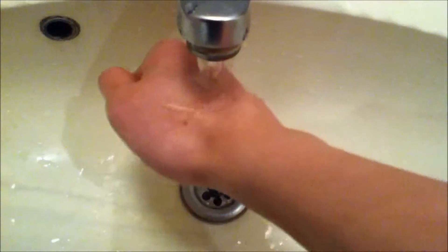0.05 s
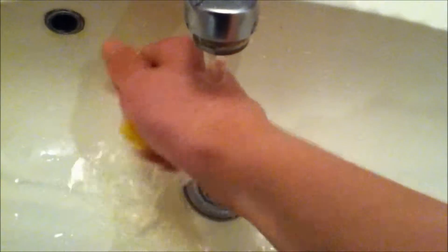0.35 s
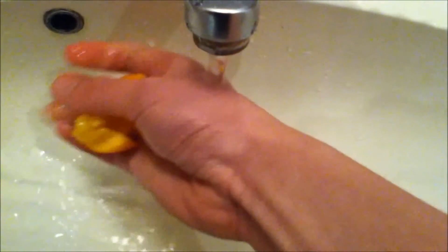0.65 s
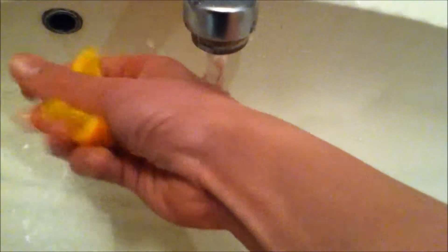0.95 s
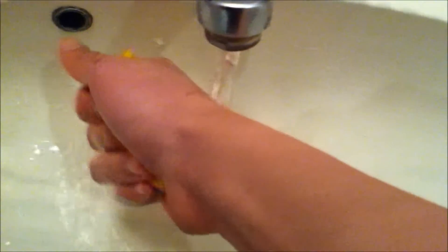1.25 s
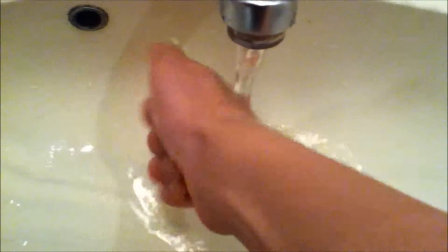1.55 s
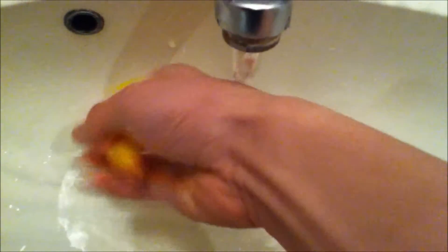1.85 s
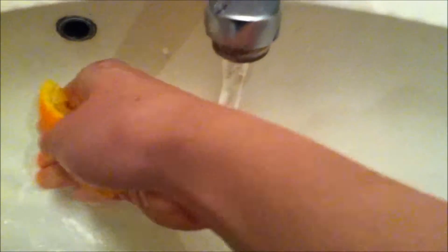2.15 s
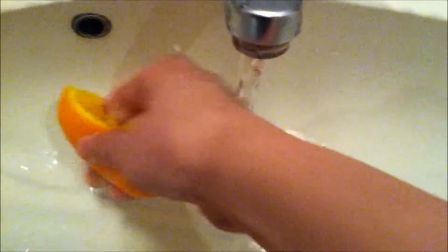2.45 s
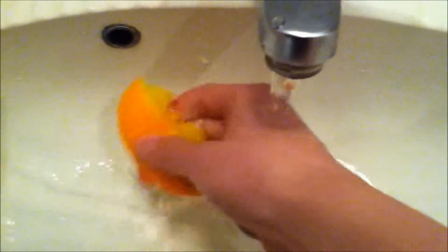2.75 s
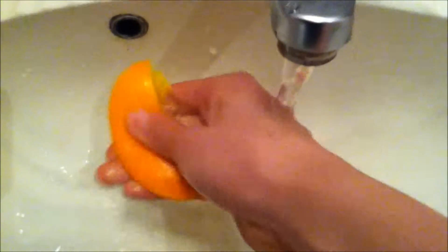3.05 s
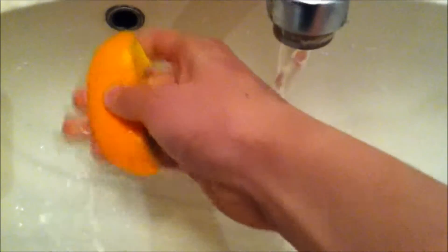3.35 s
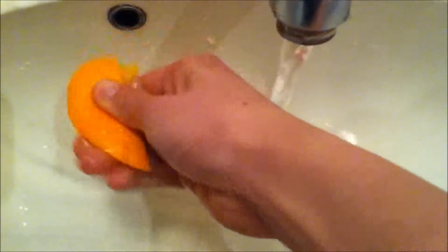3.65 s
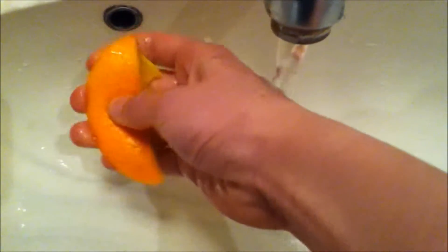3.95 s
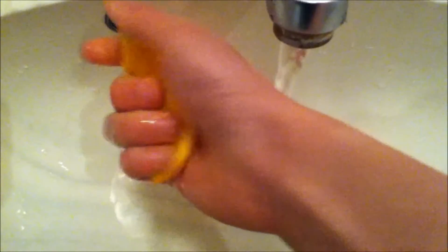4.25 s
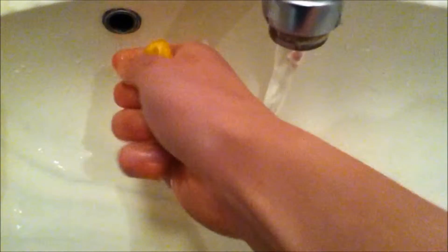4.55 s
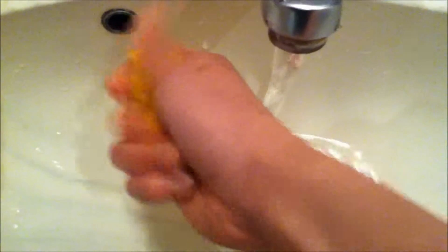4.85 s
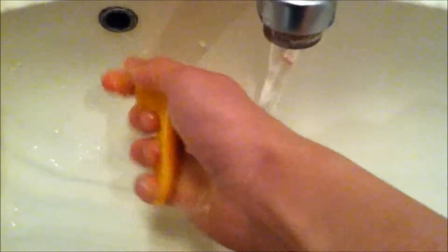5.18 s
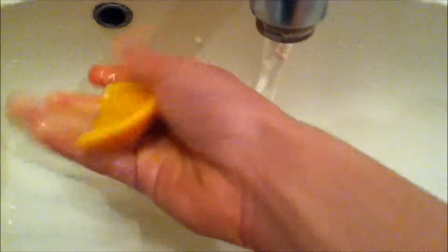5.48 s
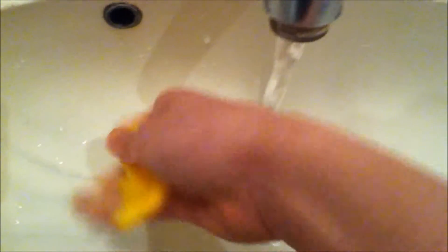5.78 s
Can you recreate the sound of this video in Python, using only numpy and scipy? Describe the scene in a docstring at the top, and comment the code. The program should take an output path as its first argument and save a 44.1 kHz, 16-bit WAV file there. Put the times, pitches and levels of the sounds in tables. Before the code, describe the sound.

Heard from close by, water rushes from a tap and beats on a ceramic sink throughout. It spatters and gurgles off a hand that turns and squeezes a piece of orange, with a sharp wet smack early on and clusters of tiny crackling pops and bubbles after it. Toward the end there are some low, soft thuds and one knock on the basin. The small tiled room adds a brief tail.

```python
"""A tap runs into a ceramic basin in a small bathroom while a hand rinses and squeezes a piece of orange.
The stream drums on the basin, tiny bubbles fizz in the spray, and water gurgles off the hand.
Frothy water sloshes, air pockets pop in the wet palm and big bubbles glug.
There are smacks of water, low thuds and, near the end, a knock against the basin.
The basin throws the splashes straight back and the tiled room adds a short tail."""
import sys
import numpy as np
from scipy import signal
from scipy.fft import rfft, irfft
from scipy.io import wavfile

SR = 44100
rng = np.random.default_rng(int(sys.argv[2]) if len(sys.argv) > 2 else 0)


def pcm_store(signal):
    """Save signal as 16-bit PCM."""
    levels = np.round(np.clip(np.atleast_2d(signal), -1, 1) * 32767)
    wavfile.write(sys.argv[1], SR, levels.astype(np.int16).T)


N = 265482
T = np.arange(N) / SR

# Levels in these tables are relative: the mix turns each layer up or down afterwards.
# The tone of the aerator, the mesh that mixes air into the stream. Each row: pitch in Hz, level in dB.
AERATOR_TONE = [(20, 0), (60, 7), (110, -1), (300, 12), (600, -2), (1050, -24), (1350, -29), (2800, 1.5),
                (3450, 11.5), (4100, 3), (5600, -11), (9000, -9), (12000, -10), (16000, -7)]
# The spout rings with the flow. Each row: pitch in Hz, starting width in Hz (tap widens it), level in dB.
SPOUT_RINGS = [(1286, 85, 1.5), (1560, 40, -14), (1950, 130, 1), (2360, 850, -7.5), (3152, 120, 3.5),
               (3480, 200, 5.5), (5300, 310, -13)]
# Low notes of the basin and the space around it. Each row: pitch in Hz, width in Hz, level in dB.
BASIN_RINGS = [(104, 24, -11.5), (148.65, 6.5, -2.5), (165, 3.8, -12.5), (184.3, 10.7, -2.5),
               (196.6, 11.5, -2.5), (208.7, 8.3, -0.5), (229.8, 6.2, -7), (252.3, 16, -8), (284.6, 7.6, -5),
               (315.6, 6.3, -5), (334.6, 17.5, -11), (349, 7.6, -12), (394.5, 8.6, -9), (435.5, 13.5, -11),
               (480.5, 15.3, -11.5), (512, 19, -16), (558.6, 5.2, -9), (695, 9.8, -12.5)]
# Water running off the hand into the bowl. Each row: time in seconds, level in dB.
RUNOFF_LEVELS = [(0.0, -46.5), (0.91, -57), (1.63, -48.5), (1.84, -53), (2.04, -57.5), (2.46, -46.5),
                 (2.93, -55), (3.66, -52.5), (3.9, -46.5), (4.03, -46.5), (4.24, -53), (4.46, -50),
                 (4.74, -44.5), (5.35, -52.5), (5.55, -51.5), (5.7, -48.5), (6.02, -50.5)]
# Spray off hand and peel, weaker where the water runs smoothly. Each row: time in seconds, level in dB.
SPRAY_LEVELS = [(0, -44), (.8, -45), (1.12, -42), (1.36, -37), (1.55, -40), (1.86, -42), (1.96, -49.5),
                (2.07, -41.5), (2.18, -42), (2.33, -40.5), (2.5, -42), (2.59, -46.5), (2.7, -45),
                (2.92, -43), (3.03, -53), (3.3, -41.5), (3.38, -52), (3.45, -42), (3.85, -39),
                (4.18, -40.5), (4.26, -49), (4.45, -41.5), (4.9, -43.5), (5.04, -44), (5.2, -42),
                (5.55, -48), (5.74, -42.5), (5.8, -44.5), (5.87, -46), (6.02, -45.5)]
# Extra spray from a squeeze or a turn of the hand. Each row: time of the peak in seconds, level in dB.
SPRAY_SPLASHES = [(.125, -52), (0.496, -28.5), (.68, -48), (.94, -38), (1.4, -49), (1.69, -39.5),
                  (2.15, -32), (2.28, -38.5), (2.749, -41), (3.15, -49.5), (3.3, -36.5), (3.41, -34.5),
                  (3.67, -38), (4.44, -33), (4.55, -33.5), (4.685, -36), (4.73, -32.5), (4.85, -45),
                  (5.635, -35.5), (5.91, -67)]
# The tone of the spray. Each row: pitch in Hz, level in dB.
SPRAY_TONE = [(600, -15), (1500, -4.5), (2700, -5.5), (3500, -2), (4300, -5), (5000, -1), (5700, 1),
              (6800, 1), (8000, 1.5), (9500, 0.5), (12000, -3.5), (16000, -20)]
# The finest spray compared with the rest. Each row: time in seconds, level in dB.
MIST_LEVELS = [(0, 0), (.8, -2.5), (1.1, 3), (1.42, -1), (1.6, -7), (1.7, -1.5), (1.95, -0.5), (2.2, -3),
               (2.35, -7.5), (2.75, -4.5), (3.05, 2.5), (3.7, -2), (4.1, -7), (4.42, -1), (5.3, -5.5),
               (6.02, 1)]
# Sheets of frothy water squeezed out or spilling off the hand.
# Each row: start in seconds, length in seconds, level in dB, first pitch in Hz, last pitch in Hz.
HAND_SLOSHES = [(0.026, 0.068, -46.5, 3430, 4530), (0.08, 0.056, -41, 2750, 1700),
                (0.486, 0.016, -26.5, 3170, 2750), (0.492, 0.021, -43.5, 1500, 2100),
                (0.523, 0.081, -44.5, 4530, 3670), (1.143, 0.026, -41.5, 2140, 2310),
                (1.261, 0.3, -46.5, 3130, 3760), (1.4, 0.021, -45, 2000, 2150),
                (1.549, 0.088, -57, 1300, 1660), (1.683, 0.16, -55.5, 1610, 1493),
                (2.227, 0.13, -45, 2410, 4300), (2.519, 0.087, -41.5, 1220, 2100),
                (2.746, 0.036, -41.5, 4200, 4600), (3.129, 0.044, -44, 2100, 2600),
                (3.424, 0.09, -47, 3900, 2900), (3.696, 0.087, -38.5, 300, 338),
                (4.431, 0.088, -47, 3570, 3470), (4.705, 0.1, -41.5, 1690, 2600),
                (4.833, 0.026, -40, 3530, 3460), (5.03, 0.038, -43, 1830, 1950),
                (5.235, 0.05, -41.5, 2550, 3250), (5.348, 0.055, -42.5, 2610, 1750),
                (5.471, 0.037, -48, 3900, 4000), (5.648, 0.039, -43, 1500, 2140)]
# The loudest air pockets bursting in palm and peel. Each row: time of the peak in seconds, level in dB,
# pitch in Hz, length in milliseconds, share of toneless crack from 0 to 1.
BIG_POPS = [(.049, -25.5, 3670, 1.4, .1), (.0926, -30.5, 4390, 2.2, 0), (.1208, -4, 5950, 0.74, 0.5),
            (.1355, -17.5, 4750, 1.6, 0.64), (.1502, -25, 8740, 1.1, .1), (.1756, -16, 5550, 1.14, .7),
            (.192, -25, 8500, .9, 0.1), (.2337, -20, 7440, .7, 0.2), (.2699, -16.5, 6020, .8, 0.5),
            (.293, -23.5, 5500, 2.2, 1), (.3364, -14.5, 7460, 1.24, 0.93), (.4202, -17, 5150, 1, 0.73),
            (.4499, -29, 3830, 1.3, 0.2), (.469, -19, 6270, .9, 0.75), (.4917, -9.5, 4570, 2.7, 0.13),
            (.4956, -9, 4800, .9, 0), (.4978, -3, 4950, .55, 0.7), (.4997, -14, 4600, .79, 0.3),
            (.5068, -20, 5470, 1, .5), (.58, -16, 7400, .73, .7), (.586, -20.5, 4370, .82, 1),
            (.6278, -25.5, 8000, .8, 0), (.6305, -24.5, 4250, 2.8, 0.2), (.6736, -18, 7000, 1.1, 0.5),
            (.6888, -24, 5750, 1.3, 0.2), (.7052, -20, 7400, .7, .5), (.7075, -30, 5300, 2.8, 0),
            (.7455, -24.5, 6960, .9, 0.4), (.7807, -22.5, 4700, 1.3, 0), (.811, -28.5, 5900, 1.8, 0),
            (.8248, -23, 4070, 3.2, 0.26), (.8576, -30, 7100, 2, 0), (.8653, -21.5, 4690, 1.9, 0.5),
            (.9265, -9, 6160, 1, .4), (.9928, -31, 4970, 3.2, 0), (1.0012, -15, 7200, .7, 0.3),
            (1.091, -33, 4040, 2.7, 0.2), (1.1571, -24, 6420, .7, 0.3), (1.1746, -14, 7200, .85, 0),
            (1.2139, -12, 10000, .28, 0.3), (1.2189, -27.5, 4920, 1.3, 0.19),
            (1.2543, -18.5, 7100, .88, 0.7), (1.2964, -18, 4080, 1.7, .15), (1.3068, -10.5, 9000, .55, 0),
            (1.3138, -17, 7410, .62, .5), (1.3271, -33, 4180, 1.6, 0), (1.3431, -26.5, 9950, 1.5, 0.2),
            (1.3488, -19, 6200, 1.4, .9), (1.354, -21.5, 4220, 1.3, 0.1), (1.3674, -29, 4440, 2.6, 0.1),
            (1.3708, -17, 7300, .8, 0.82), (1.3983, -9.5, 6900, 1.6, 0.95), (1.4017, -8.5, 7760, .9, .6),
            (1.4138, -17.5, 5740, 1.2, 0.2), (1.4202, -21, 9400, .8, 0.6), (1.4292, -17, 7600, .9, .6),
            (1.4458, -14, 8000, .74, 0), (1.4498, -26, 3820, 1.6, 0), (1.468, -31, 3870, 2.6, 0.1),
            (1.4754, -17, 6900, .8, 0.8), (1.5274, -31.5, 5650, 1.4, 0.2), (1.6154, -25.5, 3840, 1.6, 0.2),
            (1.7205, -30, 8270, 1.1, .1), (1.7449, -14, 3810, 3.4, 0.5), (1.7455, -22, 6170, 2.4, 0),
            (1.7825, -28, 8800, 1.3, 0.6), (1.7936, -21, 5900, 1.7, 0.5), (1.815, -27, 5900, 3.4, .25),
            (1.8255, -12, 5500, 1.5, .35), (1.845, -27, 6600, 1.6, 0), (1.8604, -10, 7300, .8, 0.83),
            (1.8934, -18.5, 5050, 1.6, 0.3), (1.9068, -22.5, 6100, 1.2, 0.6),
            (2.0186, -14.5, 6000, 1.7, 0.04), (2.0556, -16.5, 8000, 1.4, .83),
            (2.1452, -24, 6800, 2.6, 0.3), (2.1485, -19.5, 10000, .68, 0.65), (2.1558, -15, 8140, .75, 0.9),
            (2.1929, -29, 7490, 2, 0.2), (2.2039, -19, 7500, 1.3, 0.4), (2.208, -27.5, 3700, 3, .05),
            (2.2126, -11, 5240, .66, .65), (2.2444, -27, 5870, 1.1, .4), (2.2574, -15.5, 8300, .82, 0),
            (2.2786, -29, 5300, 3.5, .1), (2.2933, -19.5, 5340, .85, 0.03), (2.2946, -26, 7400, 1.5, 0),
            (2.303, -25.5, 4160, 1.7, 0), (2.3609, -23.5, 8900, .47, 0.5), (2.3854, -26.5, 5400, 1.6, .2),
            (2.3934, -9.5, 4970, .58, 0.1), (2.443, -16.5, 6000, 1, 0), (2.4451, -29, 4200, 2.9, 0),
            (2.5017, -29, 5340, 2.5, 0.1), (2.5174, -29, 6100, 1.3, .1), (2.5219, -15, 9200, .34, 0),
            (2.6356, -14, 3430, .8, 1), (2.6468, -22, 4240, 2.1, 0.7), (2.6794, -16.5, 4100, 1.4, 0.34),
            (2.683, -23, 7000, .6, 0.2), (2.7062, -21, 8650, .7, 0), (2.725, -26, 7660, .9, .6),
            (2.7393, -9.5, 4530, 1.5, .65), (2.758, -19.5, 8000, 1.2, .1), (2.7655, -18.5, 4830, 2.8, 0.75),
            (2.7995, -22.5, 8300, .8, 0), (2.8241, -15.5, 7400, 1.3, 1), (2.8277, -23, 5570, 3, 0.97),
            (2.8489, -16, 5900, 1.1, 0.54), (3.1623, -33.5, 5700, 2.7, 0), (3.2592, -25.5, 4620, 3, 0.7),
            (3.2893, -26, 7100, 1.6, 0), (3.301, -13, 6160, .9, 0.9), (3.3085, -21, 4500, 1.6, 0.7),
            (3.3216, -22, 4160, 1.5, 0), (3.3354, -21, 4800, 1.4, 0), (3.354, -14.5, 6260, 0.91, 0.54),
            (3.3937, -8, 6960, .5, 0.9), (3.4028, -14, 4700, 3.3, 0), (3.413, -11.5, 5250, .75, 0.3),
            (3.4238, -16.5, 7130, 2.6, 0.2), (3.426, -28, 5120, 1.3, 0), (3.4341, -23, 4690, 1.2, 0.4),
            (3.4347, -32, 7200, 3.5, 0), (3.4463, -16.5, 4400, 1, 0.4), (3.4505, -25.5, 3000, 3.2, 0.1),
            (3.4518, -27, 7260, 1.9, 0.1), (3.463, -15.5, 8100, .7, 0.97), (3.4926, -30, 3270, 2, 0),
            (3.496, -27, 3930, 1.2, 0.7), (3.5886, -13, 7400, .95, 0.94), (3.6259, -20, 10400, .6, 0.3),
            (3.656, -19, 6070, 1.2, 0.5), (3.6786, -21.5, 5630, 1.4, .1), (3.6798, -28, 6550, 3, 0),
            (3.6898, -20, 8500, 1.4, 1), (3.816, -21, 8400, .7, .5), (3.8388, -13, 5960, .7, 0.8),
            (3.8487, -16, 6300, 1.05, 0.9), (3.8607, -34, 6400, 2, 0.1), (3.8962, -28, 5430, 3.6, .05),
            (3.9323, -17, 5470, 1.3, 0), (3.9745, -24, 6950, 1, 0.01), (4.0112, -22, 5430, 1.3, 0.21),
            (4.0119, -18.5, 8330, .88, 0), (4.0283, -10, 5800, .7, 0.3), (4.0529, -25.5, 8200, .8, .1),
            (4.0758, -22.5, 10200, 1.3, 0.4), (4.0815, -21.5, 4330, 1.5, 0.7), (4.0842, -22, 5493, 1.5, .1),
            (4.1141, -18.5, 10000, .92, 0.76), (4.1267, -28, 7350, 2.3, 0), (4.1401, -20, 10800, .41, 0.6),
            (4.183, -17, 13300, .65, 0.5), (4.3244, -13.5, 6180, 1.2, 0.24),
            (4.3615, -23.5, 7880, .86, 0.2), (4.4072, -22, 6800, 1, 1), (4.4297, -16, 8400, 1.1, 0.84),
            (4.434, -33.5, 6560, 1.4, .1), (4.478, -26.5, 5470, 2, .1), (4.6497, -27, 5050, 1.3, 0),
            (4.6946, -21, 7920, .84, 0.4), (4.7335, -14.5, 5530, 1.1, 0.3), (4.7704, -28.5, 3490, 3, 0.2),
            (4.8608, -30, 5210, 2.7, 0.2), (4.8737, -16, 6030, .9, 0.7), (4.9156, -25, 5730, 1.6, 0),
            (5.099, -19, 6740, .52, 0), (5.1155, -28.5, 5120, 3.1, 0), (5.17, -26, 4570, 2.1, 0.2),
            (5.1845, -20.5, 9200, .9, 0.97), (5.3074, -32, 5400, 2.2, 0.12), (5.466, -26, 5750, .84, 0.9),
            (5.469, -20.5, 3720, 1.8, 0.17), (5.5969, -34, 6050, 1.4, 0.3), (5.6056, -23, 5940, 1.1, 0.3),
            (5.6268, -22, 5600, 1, .1), (5.6341, -20, 6100, .8, 0.4), (5.6425, -14, 5180, 1.5, 0.56),
            (5.719, -23, 6360, 1, 0.4), (5.7221, -26, 5450, 1.6, 0.4), (5.7407, -27, 5500, 2.4, 0.6),
            (5.9544, -18.5, 9200, .58, .06)]
# Water smacks, low thuds and, near the end, a knock against the basin.
# Each row: start in seconds, level in dB, middle pitch in Hz, fade time in seconds.
SMACKS_AND_KNOCKS = [(0.125, -29, 1120, 0.0049), (0.43, -20.5, 194, 0.019), (0.51, -31, 1030, 0.0034),
                     (0.49, -8, 7200, 0.0011), (0.4948, -17, 2740, 0.0017), (0.43, -14, 13300, 0.002),
                     (0.4966, -7, 10000, 0.00038), (1.4, -20, 2100, 0.0039), (1.564, -27.5, 1300, 0.0043),
                     (4.529, -24, 186, 0.026), (4.612, -26.5, 147, 0.04), (4.69, -28, 110, 0.018),
                     (4.69, -28.5, 1800, 0.0049), (4.756, -28, 1700, 0.0012), (5.7995, -19.5, 510, 0.0029),
                     (5.8005, -25.5, 660, 0.0026), (5.8, -34, 2100, 0.0035), (5.799, -25.5, 297, 0.045)]
# The largest bubbles in the water leaving the hand. Each row: start in seconds, level in dB,
# pitch in Hz, swell time in milliseconds, share by which the pitch rises per swell time.
BIG_BUBBLES = [(.128, -29, 1600, 3.2, .01), (.584, -24.5, 2170, 1.9, .01), (.659, -24.5, 2560, 2.8, .02),
               (2.062, -29.5, 1390, 4.2, 0), (2.246, -27.5, 1680, 2.4, .01), (2.42, -40, 1590, 8.2, 0),
               (2.451, -27.5, 1820, 3.4, 0.05), (2.467, -33, 1740, 3.9, .01), (2.514, -41, 900, 4.8, 0.025),
               (2.521, -34, 2100, 3.3, .02), (2.539, -26, 1980, 3, 0.019),
               (2.541, -20.5, 1400, 2.4, 0.0043), (2.551, -26, 1540, 3.5, 0), (2.58, -17.5, 1650, 2.4, 0),
               (3.432, -27.5, 1540, 2.3, 0.036), (3.755, -35, 1480, 4.1, 0.037),
               (3.773, -38, 2300, 5.5, 0.18), (3.863, -30, 2300, 2.8, 0.0043),
               (3.958, -31, 1780, 5.1, 0.15), (3.968, -34, 2500, 5.8, 0.06),
               (3.994, -35, 1010, 3.9, 0.0093), (4.525, -31, 1525, 4.9, 0.0023),
               (4.729, -23.5, 1910, 2.7, .02), (5.05, -23.5, 2010, 2.6, 0.011),
               (5.125, -31.5, 1440, 4, .01), (5.377, -34, 1970, 3.5, 0), (5.411, -32, 1787, 5.6, .05),
               (5.65, -26, 2000, 2.5, 0.0043), (5.733, -25, 1800, 2.3, 0), (5.7995, -23, 1880, 2.5, 0.049)]
# What the bowl does to the tone of every splash. Each row: pitch in Hz, level in dB.
BOWL_TONE = [(750, -2), (1060, -1.5), (1260, -1.5), (2350, -2.5), (2800, 0), (3300, 0.5)]
# Notes at which the bowl and the cupped hand ring. Each row: pitch in Hz, width in Hz, level in dB.
BOWL_RINGS = [(856, 250, 7.5), (1300, 60, -32), (1573, 55, 3.5), (1938, 175, 2), (2270, 90, -2.5),
              (3600, 1570, -2.5), (4220, 280, 1.5), (4900, 100, -20), (5360, 610, -4.5), (5910, 230, -3),
              (7800, 220, -19), (8730, 160, -6)]


def gain(db):
    """Turn decibels into a number to multiply a sound by."""
    return 10 ** (np.asarray(db) / 20)


def unit(x):
    """Scale a sound to an average strength (rms) of 1."""
    return x / np.sqrt(np.mean(x ** 2))


def add(track, start_s, sound):
    """Mix a short sound into a track."""
    i = int(np.clip(start_s * SR, 0, len(track) - 1))
    track[i:i + len(sound)] += sound[:len(track) - i]


def curve(table):
    """Join rows of time and level with straight lines."""
    return np.interp(T, *np.transpose(table))


def wander(rate):
    """Drift by about 1 either way, heading for a new random value rate times a second."""
    targets = rng.standard_normal(4096)
    return np.interp(T * rate, np.arange(len(targets)), targets)


def tone(x, points):
    """Turn lows and highs up or down along points of pitch in Hz and level in dB."""
    hz, db = np.transpose(points)
    pitches = np.maximum(np.fft.rfftfreq(N, 1 / SR), 1)
    return irfft(rfft(x) * gain(np.interp(np.log(pitches), np.log(hz), db)), N)


def resonate(x, hz, width_hz):
    """Keep the part of a sound near one pitch; a narrow width rings longer."""
    hz = min(hz, .44 * SR)
    return signal.lfilter(*signal.iirpeak(hz, hz / min(width_hz, SR / 4), fs=SR), x)


def ring(x, notes):
    """Let a sound shake a body that rings at several pitches."""
    return sum(gain(db) * resonate(x, hz, width) for hz, width, db in notes)


def hiss(samples, hz, width_hz):
    """Noise gathered around one pitch."""
    return resonate(resonate(rng.standard_normal(samples), hz, width_hz), hz, width_hz)


def burst(hz, width_hz, fade_s):
    """A puff of noise that rises quickly and dies away."""
    t = T[:SR // 6]
    rise_s = min(.6 * fade_s, max(.0008, .9 / hz))
    sound = hiss(len(t), hz, width_hz) * np.exp(-t / fade_s) * (1 - np.exp(-t / rise_s)) ** 2
    return sound * np.sqrt(fade_s * SR / 2 / np.sum(sound ** 2))


def droplets(per_s, spread_db):
    """Drops hit at random moments; with more spread, a few hit much harder."""
    hit = rng.random(N) < per_s / SR
    return hit * rng.choice([-1, 1], N) * gain(spread_db * np.minimum(rng.exponential(size=N), 4))


def bubble(hz, swell_s, glide):
    """A bubble's note swells, dies away and rises in pitch as it nears the surface."""
    t = T[:int(4.5 * np.max(swell_s) * SR) + 2]
    age = t / swell_s
    loudness = (age * np.exp(1 - age)) ** 2
    return loudness * np.sin(2 * np.pi * hz * t * (1 + glide * (age / 2 - 1)))


def froth(per_s, low_hz, high_hz, cycles, spread_db, glide):
    """A swarm of bubbles of random size, each swelling for the given number of cycles."""
    when, size, luck, sign = rng.random((int(per_s * N / SR), 4)).T[:, :, None]
    hz = low_hz * (high_hz / low_hz) ** size
    db = spread_db * np.minimum(-np.log(1 - luck), 4)
    strength = hz * gain(db) * np.sign(sign - .5)  # high notes are shorter, so make them stronger
    notes = strength * bubble(hz, cycles / hz, glide)  # one bubble a row
    places = (when * N).astype(int) + np.arange(notes.shape[1])
    return unit(np.bincount(places.ravel(), notes.ravel(), N)[:N])


def tap():
    """Water rushes steadily through the aerator and makes the spout ring."""
    rush = unit(tone(rng.standard_normal(N), AERATOR_TONE))
    spout = unit(sum(gain(db) * hiss(N, hz, 1.3 * width) for hz, width, db in SPOUT_RINGS))
    return (gain(-55) * rush + gain(-51) * spout) * gain(.25 * wander(rate=5.5))


def drumming():
    """The broken stream beats on the basin and keeps its low notes ringing."""
    level_db = -39 + 1.4 * wander(rate=5.35)
    beat = ring(droplets(per_s=2500, spread_db=2), BASIN_RINGS)
    deep_beat = tone(beat, [(30, -12), (90, -10.5), (140, 5), (600, -8.5), (1200, -14), (4000, -26)])
    return gain(level_db) * unit(deep_beat)


def gurgle():
    """Water runs off the hand, then patters and bubbles in the bowl."""
    patter = unit(droplets(per_s=2000, spread_db=0))
    bubbles = froth(per_s=260, low_hz=1150, high_hz=2900, cycles=4.2, spread_db=3, glide=.05)
    mellow = [(200, -1), (650, 3), (1080, -2.5), (1300, 2), (2400, .5), (5000, -31), (12000, -39)]
    return gain(curve(RUNOFF_LEVELS)) * unit(tone(patter + gain(-6) * bubbles, mellow))


def spray_level(rise_s=.0081, fall_s=.027):
    """How much spray flies, in dB: the flow over the hand plus sudden splashes."""
    power = gain(curve(SPRAY_LEVELS)) ** 2
    for peak_s, db in SPRAY_SPLASHES:
        shape = np.exp(-np.maximum((peak_s - T) / rise_s, (T - peak_s) / fall_s))
        power += (gain(db) * shape) ** 2
    return 10 * np.log10(power)


def spray(spray_db):
    """Tiny bubbles fizz in the airy stream and a few drops tick on the glaze, in uneven spurts."""
    ticks = unit(droplets(per_s=170, spread_db=3.6))
    fizz = froth(per_s=2400, low_hz=2600, high_hz=15000, cycles=4.4, spread_db=3.4, glide=.06)
    drops = unit(tone(fizz + gain(-5) * ticks, SPRAY_TONE))
    mist = tone(drops, [(5500, -17.5), (10000, -2.5), (16000, 1)])
    spurts = gain(spray_db + 2.5 * wander(rate=45))
    mist_gain = gain(curve(MIST_LEVELS) - 1 + 2.5 * wander(rate=30))
    return (drops + (mist_gain - 1) * mist) * spurts


def sloshes(bubbles=60, cycles=3.6, pitch_scatter=.225, spread_db=5):
    """A slosh is a cloud of brief bubbles whose pitch slides as the sheet of water thins or thickens."""
    out = np.zeros(N)
    for start_s, length_s, db, first_hz, last_hz in HAND_SLOSHES:
        cloud = np.zeros(N // 8)
        for progress, (detune, size) in zip(rng.random(bubbles), rng.standard_normal((bubbles, 2))):
            hz = first_hz * (last_hz / first_hz) ** progress * np.exp(pitch_scatter * detune)
            strength = np.sin(np.pi * progress) * gain(spread_db * size)
            add(cloud, progress * length_s, strength * bubble(hz, cycles / hz, glide=.06))
        add(out, start_s, gain(db) * cloud * np.sqrt(length_s * SR / np.sum(cloud ** 2)))
    return out


def small_pops(spray_db, usual_db=-39.5, usual_per_s=22, middle_hz=7640, octaves=1.39, cycles=6):
    """Random rows like those of BIG_POPS: more spray traps more air pockets, and stronger ones."""
    when, luck, strength, size, crack = rng.random((600, 5)).T
    extra_db = spray_db[(when * N).astype(int)] - usual_db
    happens = luck < usual_per_s * T[-1] / len(when) * gain(extra_db)
    db = -27.5 - .5 * (strength - .5) + .25 * extra_db
    hz = middle_hz * 2 ** (octaves * (size - .5))
    return np.column_stack([when * T[-1], db, hz, cycles * 1000 / hz, crack])[happens]


def pops(pockets):
    """Each air pocket opens with a wet crack, a little above its note, and rings for a few cycles."""
    out = np.zeros(N)
    for peak_s, db, hz, length_ms, crack in pockets:
        length_s = length_ms / 1000
        swell_s = .62 * length_s
        note = np.sqrt(1 - crack) * bubble(hz, swell_s, glide=.04)
        snap = np.sqrt(crack + .093) * burst(1.08 * hz, .84 * hz, length_s)  # always a little crack
        add(out, peak_s - swell_s, gain(db) * note)
        add(out, peak_s - swell_s, gain(db - 6) * snap)
    return tone(out, [(300, -6), (1500, -13), (3000, -.5), (4600, -2), (8000, 1), (16000, 3.5)])


def smacks_and_knocks():
    """Water smacks, low thuds and a knock against the basin, all made of short puffs of noise."""
    out = np.zeros(N)
    for start_s, db, hz, fade_s in SMACKS_AND_KNOCKS:
        add(out, start_s, gain(db) * burst(hz, .37 * hz, fade_s))
    return out


def glugs():
    """Big bubbles ring, most chirping upwards, and splat softly as their skin of water tears."""
    out = np.zeros(N)
    for start_s, db, hz, swell_ms, glide in BIG_BUBBLES:
        swell_s = swell_ms / 1000
        add(out, start_s, gain(db) * bubble(hz, swell_s, glide))
        add(out, start_s, gain(db - 7.5) * burst(hz, hz / 2, swell_s))
    return out


def echoes(x, first_s, tail_s):
    """Closely packed echoes start after first_s and fade by 60 dB every tail_s."""
    t = T[:SR // 2]
    tail = rng.standard_normal(len(t)) * (t > first_s) * gain(-60 * t / tail_s)
    return signal.fftconvolve(x, tail / np.linalg.norm(tail))[:N]


def basin_echoes(x, patterns=16):
    """The basin throws sound back; as the hand moves, one pattern of echoes fades into the next."""
    place = T / T[-1] * (patterns - 1)
    fades = (np.sqrt(np.maximum(1 - abs(place - k), 0)) for k in range(patterns))
    return sum(echoes(x * fade, first_s=.001, tail_s=.024) for fade in fades)


def room_echoes(x):
    """The tiled room adds a short, duller tail."""
    tail = echoes(x, first_s=.0065, tail_s=.15)
    return tone(tail, [(200, 4.5), (4000, -1), (9000, -7), (16000, -44)])


def scene():
    """Mix the steady tap and drumming with the splashing water and its echoes, in one channel."""
    steady = tap() + drumming()
    spray_db = spray_level()
    stream = gain(-.5) * gurgle() + gain(-2.5) * spray(spray_db)
    hand = gain(-6) * glugs() + gain(-5.5) * smacks_and_knocks() + gain(-3) * sloshes()
    hand += gain(-1.5) * pops([*BIG_POPS, *small_pops(spray_db)])
    water = tone(stream + hand, BOWL_TONE)
    water += gain(-4.5) * ring(water, BOWL_RINGS)
    return (water + gain(-7) * basin_echoes(water) + gain(-12) * room_echoes(water) + steady)[None]


def record(dry):
    """Cut the highest treble, above 15900 Hz."""
    return signal.sosfilt(signal.ellip(10, .2, 80, 15900, fs=SR, output="sos"), dry)


dry = scene()
out = record(dry)
pcm_store(out)
```